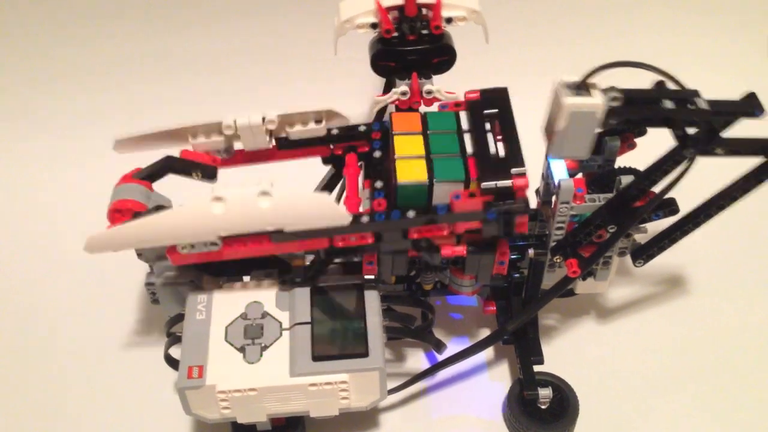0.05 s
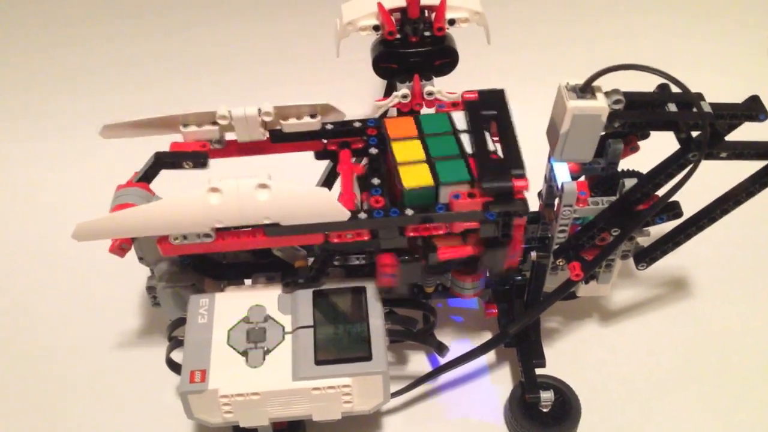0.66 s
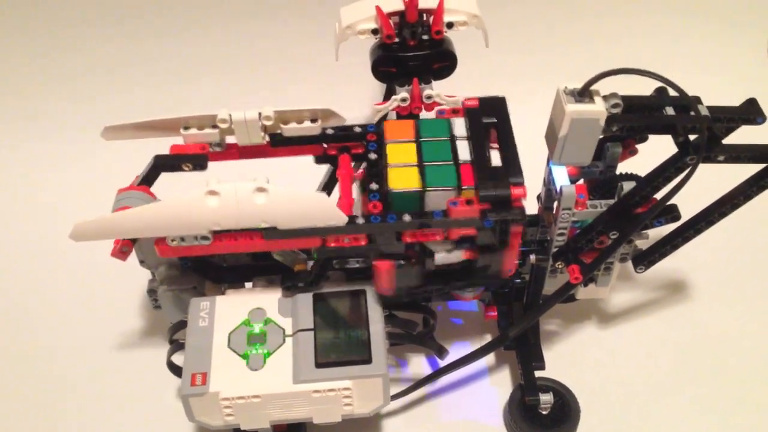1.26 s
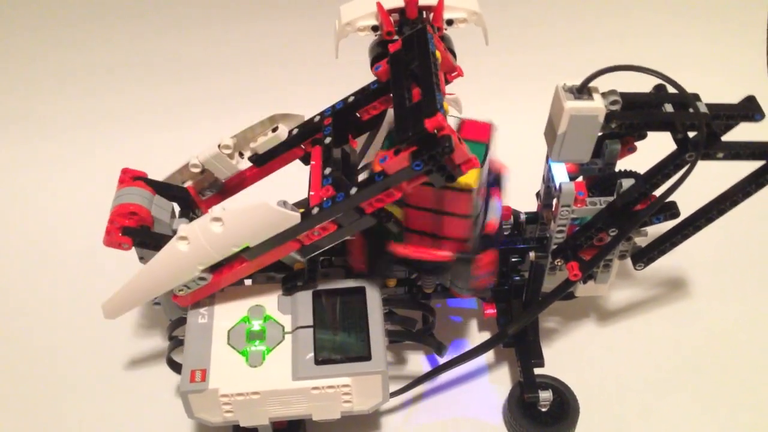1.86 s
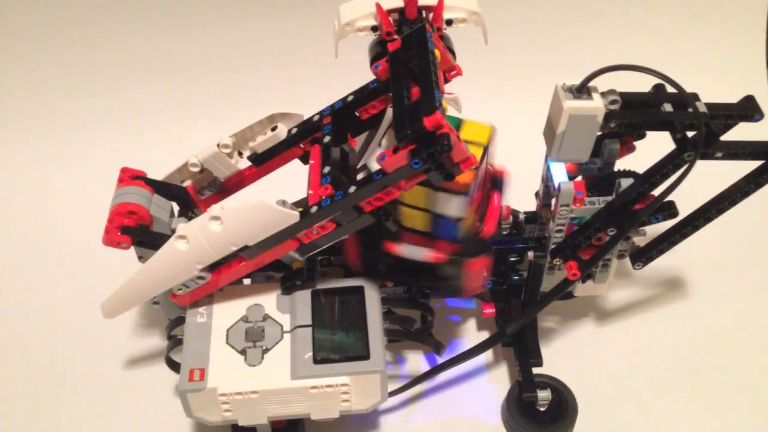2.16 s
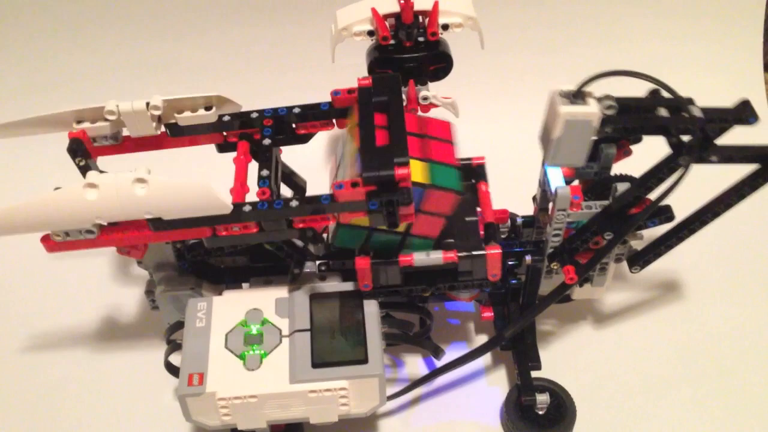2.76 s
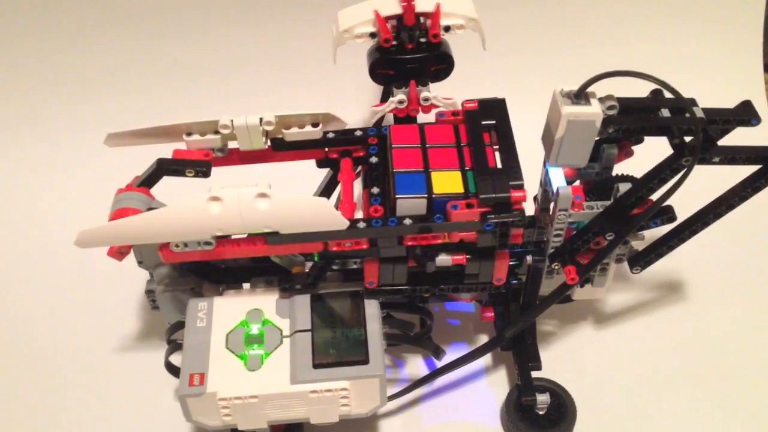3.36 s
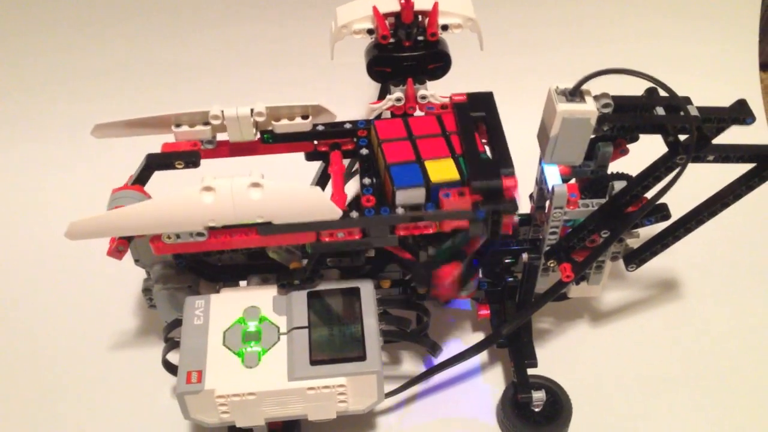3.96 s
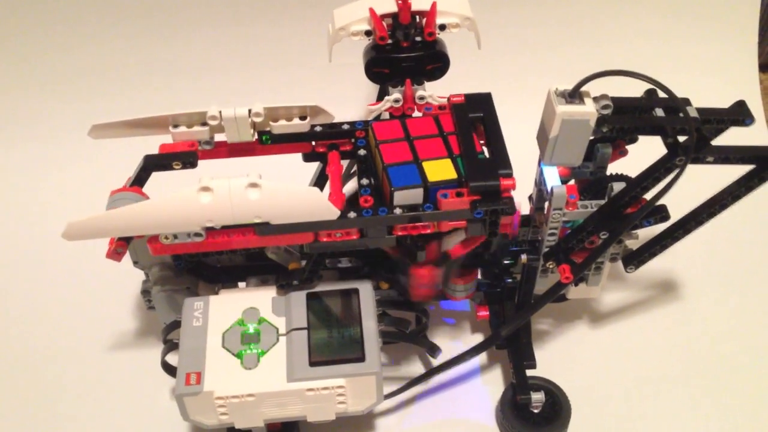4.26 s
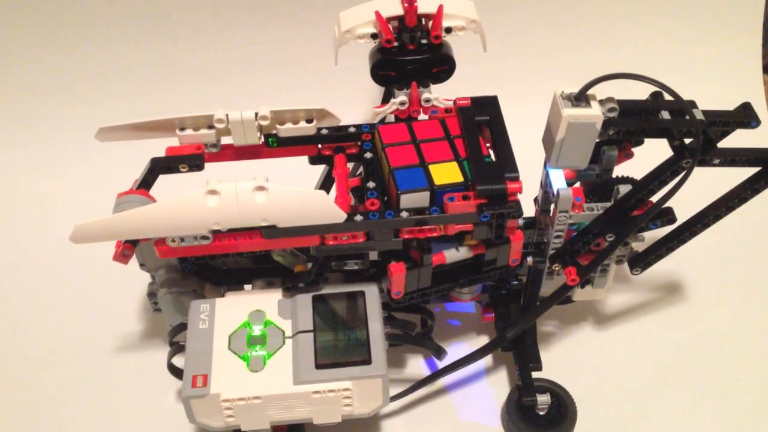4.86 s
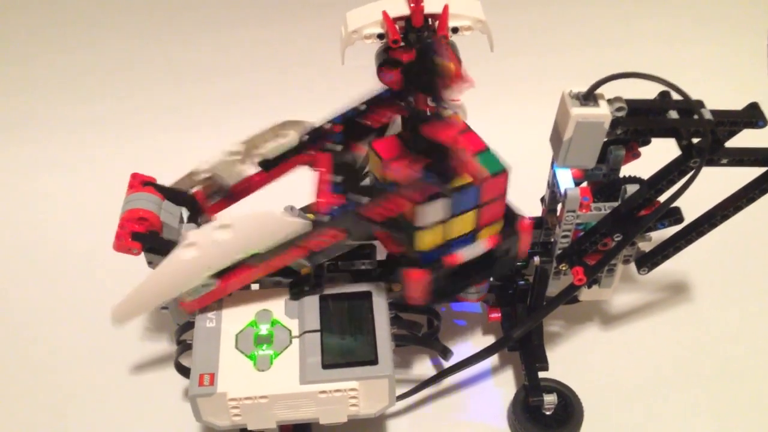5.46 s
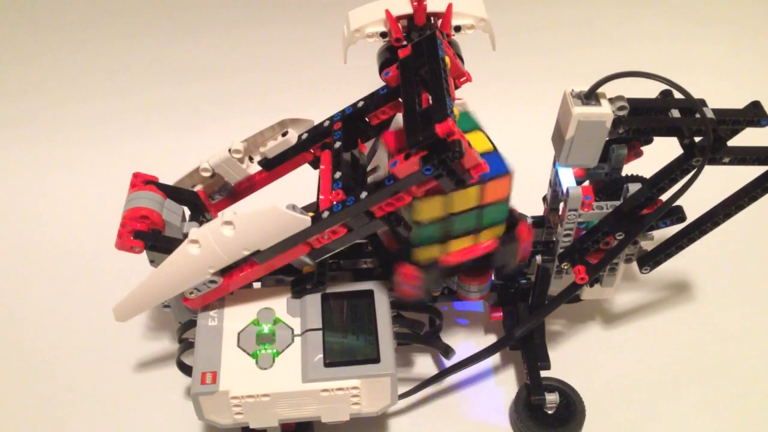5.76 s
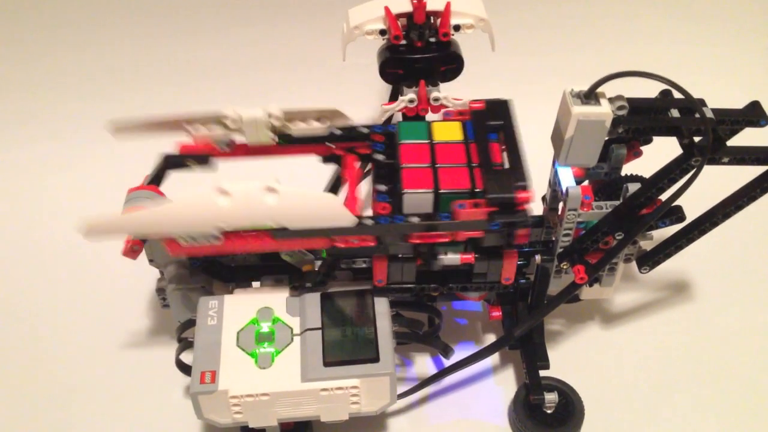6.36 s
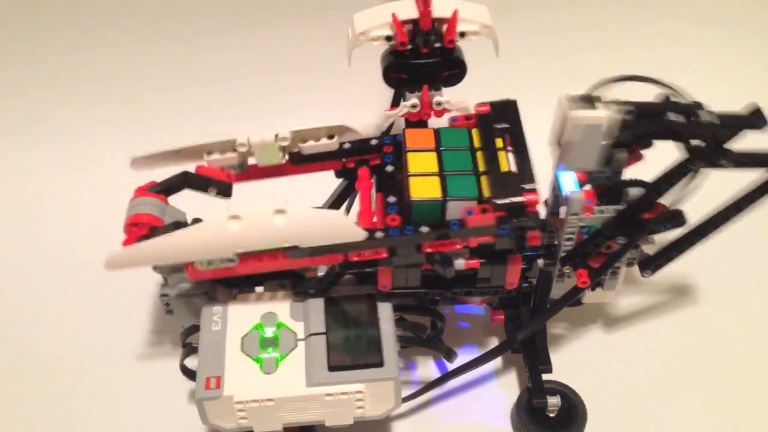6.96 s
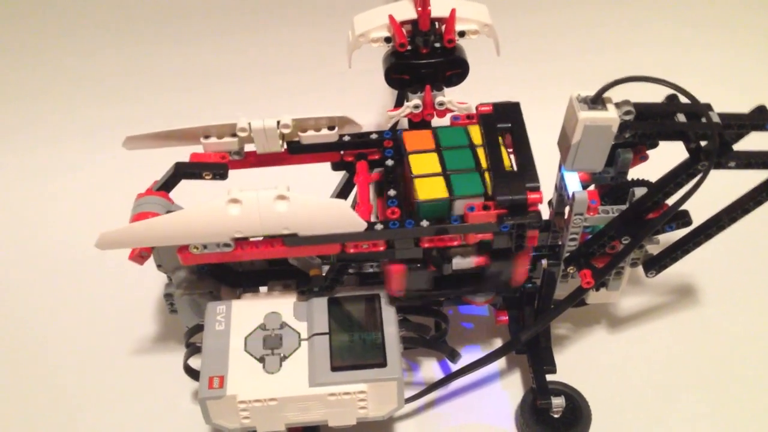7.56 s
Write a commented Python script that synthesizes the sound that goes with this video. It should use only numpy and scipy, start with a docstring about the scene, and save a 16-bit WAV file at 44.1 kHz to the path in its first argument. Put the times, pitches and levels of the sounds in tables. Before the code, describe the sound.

A toy-brick robot turns a puzzle cube on a table, heard up close. It opens with a brief motor whir and two plastic clacks. From 0.6 to 1 second the turntable motor rises into a high, rattling gear whine. A blip and a squeaky arm stroke follow, then another whir from 1.6 to 2.2 seconds. Between 2.3 and 3.3 seconds the arm motor jerks in quick strokes, flipping the cube with sharp clacks, hollow knocks and light tabletop thumps. The turntable whirs again from 3.8 to 4.5 seconds, two short bursts come just after 5, and another run lasts from 5.4 to 6. A second clattering flip fills 6.1 to 7.1 seconds, with the hardest clack near 6.3. Loose bricks tick and settle, and a motor just starts again around 7.6. The small room adds a short echo and a faint steady hiss and rumble.

```python
"""Toy robot turning a puzzle cube

A toy-brick robot on a table spins and flips a puzzle cube, heard from close above. Two geared motors
run in bursts, one for the arm and one for the turntable. Their teeth whine and rattle in plastic housings.
The arm and the cube clack against the frame, which knocks on the tabletop, and a small room echoes."""
import sys
import numpy as np
from scipy import signal
from scipy.fft import rfft, irfft, next_fast_len
from scipy.io import wavfile

SR = 44100
rng = np.random.default_rng(int(sys.argv[2]) if len(sys.argv) > 2 else 0)


def store_wav(level_fs):
    """Save 16-bit WAV to argv[1]."""
    pcm = np.round(np.clip(np.atleast_2d(level_fs), -1, 1) * 32767)
    wavfile.write(sys.argv[1], SR, pcm.T.astype(np.int16))


N = 335601
TIME = np.arange(N) / SR

# Levels in the tables are relative: filters and the mix set the final loudness.
# The strokes of each arm move. A flip lets go, pushes the cube over, eases off, pulls back, overshoots
# and corrects its position. "Strain" is a surge at top speed; "groan" boosts whine near GROAN_HZ.
# start_s, drive_s, top_tooth_hz, rattle_db, whine_db, rumble_db, strain_db, groan_db
ARM_MOVES = { "grip": [(0.00081, 0.109, 905, -32, -36.5, -54, 2.5, 13.5)],
             "flip": [(0, 0.135, 822.7, -32, -42, -56, 4, 5),
             (0.288, 0.125, 838.2, -35.5, -28.5, -64.5, 2, -2), (0.425, 0.093, 520, -39, -58, -52, -11, -8),
             (0.685, 0.14, 1080, -35, -43, -64, 7, 15), (0.825, 0.054, 700, -37, -56, -49.5, 0.5, -8),
             (0.937, 0.035, 540, -39.5, -62, -66.5, 10.5, -3)]}
# What the arm does, opening partway through a flip: move, start_s, level_db
ARM_ROUTINE = [("flip", -0.838, -1.1), ("grip", 1.42, 0.68), ("flip", 2.318, -0.68), ("grip", 5.208, -0.59),
               ("flip", 6.116, 0.55)]
# Plastic parts hitting each other: start_s, crack_db, knock_db, thump_db
CLACKS = [(0.0235, -22, -52, -47), (0.0561, -22, -38.5, -56), (1.444, -28, -63, -76),
          (1.4794, -27, -44, -61), (1.5494, -38, -44, -67), (1.7159, -19.5, -41, -44.5),
          (2.3575, -19, -50, -57), (2.4549, -10.5, -41.5, -45), (2.6764, -31, -49, -55),
          (2.7994, -32, -48.5, -52), (2.8123, -16.5, -52, -64), (3.1272, -16.5, -49, -49),
          (3.183, -23, -52, -64), (3.2263, -15.5, -45.5, -52), (5.5041, -15.5, -40, -46.5),
          (6.1588, -18.5, -54, -60), (6.2552, -8, -39, -41), (6.4754, -23, -42, -57),
          (6.5953, -29, -41, -49), (6.6115, -13, -46, -53), (6.9302, -22, -35.5, -54),
          (6.978, -22.5, -60.5, -54), (7.02, -19, -49, -61)]
# Turntable runs: start_s, drive_s, top_tooth_hz, drag_slowing_hz, rattle_db, whine_db, whine_build_s
TURNTABLE_RUNS = [(0.607, 0.43, 1135, 0, -31.4, -34.5, 0.028), (1.245, 0.084, 982, -15, -35, -42, 0.014),
                  (1.583, 0.639, 1196, 14, -32, -33.5, 0.038), (3.769, 0.75, 1106, 54.5, -33, -34.5, 0.03),
                  (5.024, 0.083, 973, 0, -37, -43.5, 0.021), (5.376, 0.636, 1193, 13, -33.5, -33, 0.053),
                  (7.558, 0.087, 973, 0, -31, -38.5, 0.018)]

# The tones in each gear whine: multiple_of_tooth_rate, level_db
ARM_HARMONICS = [(2, -9), (3, -5), (4, 0.5), (5, -13), (6, -4.5)]
TURNTABLE_HARMONICS = [(2, -8), (3, -3), (4, -2.5), (5, -4), (6, -1), (7, -3), (8, 0), (9, -15), (10, -2)]

# Each sound's colour, or broad balance from bass to treble: pitch_hz, level_db
ROOM_TONE_COLOUR = [(25, -21.5), (79, 1.5), (180, -8), (330, -7), (600, -19), (1200, -20), (4000, -17),
                    (15000, -21.5)]
ARM_RATTLE_COLOUR = [(100, -41), (1150, -17.5), (1500, -4), (2600, -5.5), (4600, 2), (6500, -2.5),
                     (10000, -4.5), (15500, -7)]
WHINE_COLOUR = [(700, -16.5), (1200, -11.5), (1400, -1), (6000, 4), (12000, -2)]
RUMBLE_COLOUR = [(30, -36), (70, -18.5), (160, 3), (240, -8.5), (380, -9.5), (600, -15), (1500, -23.5)]
CRACK_COLOUR = [(500, -25), (4500, -1), (7000, 2.5), (15500, -3.5)]
CHATTER_COLOUR = [(200, -30.5), (1000, -11), (2400, -2.5), (4200, 0), (7000, 0.5), (11000, -1.5),
                  (15500, -25)]
KNOCK_COLOUR = [(200, -33), (410, -6.5), (540, -22.5), (800, -1.5), (1150, -9), (3000, -21.5)]
THUMP_COLOUR = [(30, -30), (70, -4), (160, 0), (240, -6), (380, -11), (600, -12.5), (1500, -47)]
TURNTABLE_RATTLE_COLOUR = [(40, -40), (150, -18), (400, -24.5), (1200, -20.5), (1420, -8.5), (2800, -12.5),
                           (3300, -6.5), (5400, 2.5), (7400, 0.5), (10200, 1.5), (12000, -1), (15500, -8.5)]

# Where each motor housing rings (or dulls the sound, if negative): pitch_hz, width_hz, boost_db
ARM_HOUSING = [(1950, 177, 4.2), (4210, 890, 3.8), (5263, 280, 6.2)]
TURNTABLE_HOUSING = [(1490, 83, 4), (3560, 58, 15), (3670, 680, 2), (5250, 190, 4.5), (8040, 160, -12),
                     (8540, 170, 5), (10370, 480, 7), (11200, 200, 0.5)]
# Where the frame rings, so a whine swells as it glides through: pitch_hz, width_hz, boost_db
ARM_FRAME = [(1900, 230, 9.3), (2624, 190, 12), (3190, 150, 15.5), (4010, 360, 18), (4840, 220, 4)]
TURNTABLE_FRAME = [(1470, 340, 23.5), (1853, 160, 9), (2442, 300, 13), (3224, 91, 4), (3370, 630, 10.5),
                   (4190, 260, 4), (5600, 520, 11.5), (5910, 220, 0), (8420, 390, 10.5), (9900, 170, 13.5),
                   (10660, 900, 11.5)]
# Where the cube and frame ring when struck: pitch_hz, width_hz, boost_db
PLASTIC_RINGS = [(3350, 110, 2), (3810, 530, 4.5), (4900, 180, 7), (5920, 170, 7.5)]

# The tooth rate is how many gear teeth meet each second. It sets the pitch of the whine.
COAST_S = 0.2  # time allowed for a motor to run down
ARM_START_HZ, ARM_RAMP_HZ_PER_S, ARM_BRAKE_S = 428.5, 4700, 0.045
STRAIN_S = 0.016  # width of the surge at top speed
SQUEAL_AFTER_S, SQUEAL_S, SQUEAL_PER_STRAIN = 0.006, 0.023, 1.78  # a squeal follows the surge
GROAN_HZ, GROAN_WIDTH_HZ = 2000, 260
START_TICK_DB, SETTLE_TICK_DB = (-45, -76, -90), (-49, -63, -82)  # each: crack, knock, thump
SETTLE_AFTER_S, SETTLE_GAP_S, SETTLE_DB_PER_S = 1.05, 0.1, 44
TURN_START_HZ, SPIN_UP_S, SPIN_DOWN_S = 383.4, 0.1, 0.055
DRAG_AFTER_S, DRAG_WIDTH_S = 0.58, 0.17  # the load is heaviest this far into a turntable run
SLACK_BELOW_HZ = 1000  # under this tooth rate the turntable gears run loose


def from_db(db):
    """Turn decibels into a number to multiply a sound by."""
    return 10 ** (np.asarray(db) / 20)


def unit_level(x):
    """Scale a signal so that its average power is 1."""
    return x / np.sqrt(np.mean(x ** 2) + 1e-20)


def drift(rate_hz, step=40):
    """A smooth random wander, about 1 in size."""
    pole = np.exp(-2 * np.pi * step * rate_hz / SR)
    slow = signal.lfilter([1], [1, -2 * pole, pole * pole], rng.standard_normal(N // step + 2002))[2000:]
    return np.interp(np.arange(N) / step, np.arange(len(slow)), unit_level(slow))


def body(x, colour, rings=()):
    """Filter a sound as an object would: a broad colour plus narrow pitches where it rings."""
    size = 2 * next_fast_len(N // 2 + SR // 10)
    hz = np.maximum(np.fft.rfftfreq(size, 1 / SR), 1)
    colour_hz, colour_db = np.array(colour).T
    db = np.interp(np.log(hz), np.log(colour_hz), colour_db)
    for pitch_hz, width_hz, boost_db in rings:
        db = db + boost_db / (1 + (2 * (hz - pitch_hz) / width_hz) ** 2)
    cepstrum = irfft(np.log(unit_level(from_db(db))))
    cepstrum[1:size // 2] *= 2  # fold the filter in time so nothing rings before its cause
    cepstrum[size // 2 + 1:] = 0
    return irfft(rfft(x, size) * np.exp(rfft(cepstrum)))[:N]


def room_tone(level_db=-67):
    """A faint, steady rumble and hiss in the background."""
    return from_db(level_db) * body(rng.standard_normal(N), ROOM_TONE_COLOUR)


def run_clock(start_s, drive_s):
    """The samples of one motor run, coasting included, and the seconds since it began."""
    span = np.flatnonzero((TIME >= start_s) & (TIME < start_s + drive_s + COAST_S))
    return span, TIME[span] - start_s


def envelope(age, drive_s, swell_db, swell_s, hold_s, fade_db_per_s):
    """The loudness of one run: it swells, holds until just after the drive ends, then fades."""
    fade_db = fade_db_per_s * np.maximum(age - drive_s - hold_s, 0)
    return from_db(-swell_db * np.exp(-age / swell_s) - fade_db)


def braking(age, drive_s, brake_s):
    """How much of the gained speed is left after the drive ends."""
    return np.exp(-np.maximum(age - drive_s, 0) / brake_s)


def gears(tooth_hz, harmonics, wobble, flutter, waver_db, uneven_db, bite_db, repeat_db):
    """A wheel of uneven teeth: they whine as they meet, and each one lets the loose gears rattle."""
    teeth, bumps = 20, 800  # around one wheel
    teeth_passed = np.cumsum(tooth_hz * (1 + flutter * drift(25))) / SR
    spacing, height = (np.interp(teeth_passed, np.arange(teeth), unit_level(e - e.mean()), period=teeth)
                       for e in rng.standard_normal((2, teeth)))
    # Uneven spacing comes round on every turn and adds side tones to each harmonic.
    phase = 2 * np.pi * (teeth_passed + wobble * spacing)
    whine = sum(from_db(db + waver_db * drift(35)) * np.sin(k * phase) for k, db in harmonics)
    # The same rough faces meet on every turn, so part of the rattle is a buzz that follows the speed.
    surface = rng.standard_normal(bumps)
    buzz = np.interp(teeth_passed / teeth * bumps, np.arange(bumps), surface, period=bumps)
    bites = from_db(uneven_db * height + bite_db * np.cos(phase))
    rattle = bites * (rng.standard_normal(N) + from_db(repeat_db) * buzz)
    return [layer / np.std(layer[tooth_hz > 0]) for layer in (whine, rattle)]


def arm_strokes():
    """List every stroke of the arm as (start_s, level_db, the rest of its row)."""
    return [(move_s + row[0], move_db, row[1:])
            for move, move_s, move_db in ARM_ROUTINE for row in ARM_MOVES[move]]


def arm_drive():
    """The arm's speed and loudness: each stroke speeds up evenly, strains at top speed and brakes."""
    controls = np.zeros((5, N))
    for start_s, move_db, stroke in arm_strokes():
        drive_s, top_hz, rattle_db, whine_db, rumble_db, strain_db, groan_db = stroke
        span, age = run_clock(start_s, drive_s)
        gained_hz = np.minimum(ARM_RAMP_HZ_PER_S * np.minimum(age, drive_s), top_hz - ARM_START_HZ)
        tooth_hz = ARM_START_HZ + gained_hz * braking(age, drive_s, ARM_BRAKE_S)
        past_top_s = age - (top_hz - ARM_START_HZ) / ARM_RAMP_HZ_PER_S
        surge_db = strain_db * np.exp(-(past_top_s / STRAIN_S) ** 2)
        squeal_db = SQUEAL_PER_STRAIN * strain_db * np.exp(-((past_top_s - SQUEAL_AFTER_S) / SQUEAL_S) ** 2)
        rattle = envelope(age, drive_s, swell_db=28.5, swell_s=0.024, hold_s=0.012, fade_db_per_s=306)
        whine = envelope(age, drive_s, swell_db=28.5, swell_s=0.03, hold_s=0.002, fade_db_per_s=450)
        rumble = envelope(age, drive_s, swell_db=29, swell_s=0.016, hold_s=0.0079, fade_db_per_s=169)
        rattle *= from_db(rattle_db + move_db + surge_db)
        whine *= from_db(whine_db + move_db + squeal_db)
        rumble *= from_db(rumble_db + move_db)
        groan = np.full(len(age), groan_db)
        controls[:, span] = np.maximum(controls[:, span], [tooth_hz, rattle, whine, rumble, groan])
    return controls


def arm():
    """The arm motor under load: whine tones swell near the groan pitch, and the frame shakes."""
    tooth_hz, rattle_gain, whine_gain, rumble_gain, groan_db = arm_drive()
    harmonics = [(k, db + groan_db * np.exp(-((k * tooth_hz - GROAN_HZ) / GROAN_WIDTH_HZ) ** 2))
                 for k, db in ARM_HARMONICS]
    whine, rattle = gears(tooth_hz, harmonics, wobble=0.02, flutter=0.008,
                          waver_db=6, uneven_db=2, bite_db=-1, repeat_db=-1.5)
    rattle = body(rattle_gain * rattle, ARM_RATTLE_COLOUR, ARM_HOUSING)
    whine = body(whine_gain * whine, WHINE_COLOUR, ARM_FRAME)
    rumble = body(rumble_gain * rng.standard_normal(N), RUMBLE_COLOUR)
    return from_db(-1.25) * rattle + from_db(-3) * whine + from_db(1) * rumble


def blows(starts_s, levels_db, rise_s, contact_s, fade_60db_s):
    """Each blow is a brief crowd of tiny contacts that builds, holds and dies away."""
    force = np.zeros(N)
    age = TIME[:SR // 2]
    shape = (1 - np.exp(-age / rise_s)) * from_db(-60 * np.maximum(age - contact_s, 0) / fade_60db_s)
    for start_s, level_db in zip(starts_s, levels_db):
        at = round(start_s * SR)
        force[at:at + len(shape)] += from_db(level_db) * shape[:N - at]
    return force * rng.standard_normal(N)


def clacks(hits):
    """Hard plastic cracks, loose bricks chatter, the frame knocks and the tabletop thumps."""
    starts_s, crack_db, knock_db, thump_db = zip(*hits)
    crack = blows(starts_s, crack_db, rise_s=0.00016, contact_s=0.0029, fade_60db_s=0.013)
    chatter = blows(starts_s, crack_db, rise_s=0.0018, contact_s=0.0057, fade_60db_s=0.036)
    knock = blows(starts_s, knock_db, rise_s=0.00029, contact_s=0.0034, fade_60db_s=0.046)
    thump = blows(starts_s, thump_db, rise_s=0.0067, contact_s=0.017, fade_60db_s=0.064)
    return (from_db(-9) * body(crack, CRACK_COLOUR)
            + from_db(-13) * body(chatter, CHATTER_COLOUR, PLASTIC_RINGS)
            + body(knock, KNOCK_COLOUR)
            + from_db(-1) * body(thump, THUMP_COLOUR))


def small_ticks(per_flip=6):
    """Faint extra clacks: loose gears catch at each motor start, and bricks settle after each flip."""
    ticks = [(run[0], *START_TICK_DB) for run in TURNTABLE_RUNS + arm_strokes()]
    for move, move_s, _ in ARM_ROUTINE:
        if move == "flip":
            for wait_s in SETTLE_GAP_S * (np.arange(per_flip) + rng.uniform(-0.78, 0.62, per_flip)):
                levels_db = np.array(SETTLE_TICK_DB) - SETTLE_DB_PER_S * wait_s
                ticks.append((move_s + SETTLE_AFTER_S + wait_s, *levels_db))
    return [tick for tick in ticks if 0 <= tick[0] < TIME[-1]]


def turntable_drive():
    """The turntable's speed and loudness: each run eases toward top speed, feels any drag and brakes."""
    controls = np.zeros((3, N))
    for start_s, drive_s, top_hz, drag_hz, rattle_db, whine_db, build_s in TURNTABLE_RUNS:
        span, age = run_clock(start_s, drive_s)
        gained_hz = (top_hz - TURN_START_HZ) * (1 - np.exp(-np.minimum(age, drive_s) / SPIN_UP_S))
        gained_hz -= drag_hz * np.exp(-((age - DRAG_AFTER_S) / DRAG_WIDTH_S) ** 2)
        tooth_hz = TURN_START_HZ + gained_hz * braking(age, drive_s, SPIN_DOWN_S)
        rattle = envelope(age, drive_s, swell_db=21.5, swell_s=0.034, hold_s=0.014, fade_db_per_s=307.5)
        whine = envelope(age, drive_s, swell_db=47, swell_s=build_s, hold_s=0.0024, fade_db_per_s=288)
        run = [tooth_hz, from_db(rattle_db) * rattle, from_db(whine_db) * whine]
        controls[:, span] = np.maximum(controls[:, span], run)
    return controls


def turntable():
    """The motor that spins the cube: at low speed its loose gears rasp and shake the frame."""
    tooth_hz, rattle_gain, whine_gain = turntable_drive()
    loose = np.clip(1 - tooth_hz / SLACK_BELOW_HZ, 0, 1)  # 1 at rest, 0 at speed
    whine, rattle = gears(tooth_hz, TURNTABLE_HARMONICS,
                          wobble=0.015 + 0.11 * loose, flutter=0.005 + 0.05 * loose,
                          waver_db=4, uneven_db=0.5, bite_db=2, repeat_db=2.5)
    rattle = body(rattle_gain * rattle, TURNTABLE_RATTLE_COLOUR, TURNTABLE_HOUSING)
    whine = body(whine_gain * whine, WHINE_COLOUR, TURNTABLE_FRAME)
    rumble = body(loose * rattle_gain * rng.standard_normal(N), RUMBLE_COLOUR)
    return from_db(-1.47) * rattle + from_db(-1.5) * whine + from_db(-17) * rumble


def room_echo(x, echo_db, fade_60db_s, delay_s):
    """Add a short, blurred echo from the table and the nearby walls."""
    age = TIME[:SR // 2]
    fade_in = np.clip(age / delay_s - 1, 0, 1)
    tail = rng.standard_normal(len(age)) * from_db(-60 * age / fade_60db_s) * fade_in
    tail = signal.sosfilt(signal.butter(1, 9000, fs=SR, output="sos"), tail)
    return x + from_db(echo_db) * signal.fftconvolve(x, tail / np.linalg.norm(tail))[:N]


def scene():
    """The robot in its room, the same in the left and right channels."""
    robot = turntable() + arm() + clacks(CLACKS + small_ticks())
    robot = room_echo(robot, echo_db=-14, fade_60db_s=0.24, delay_s=0.0038)
    return np.tile(robot + room_tone(), (2, 1))


def record(dry):
    """Cut off the very highest treble steeply."""
    cutoff_hz = 15450
    return signal.sosfilt(signal.ellip(12, 0.1, 80, cutoff_hz, fs=SR, output="sos"), dry)


dry = scene()
out = record(dry)
store_wav(out)
```